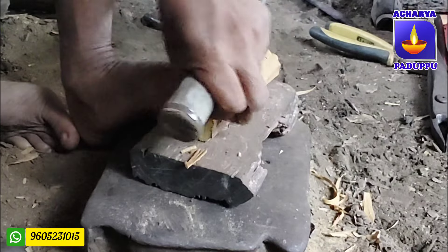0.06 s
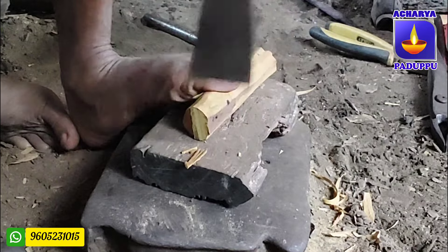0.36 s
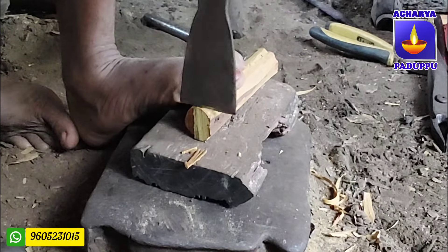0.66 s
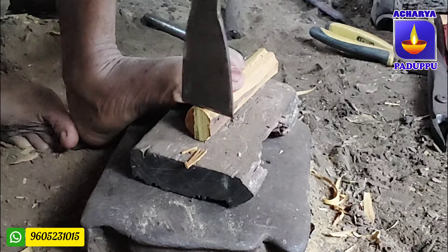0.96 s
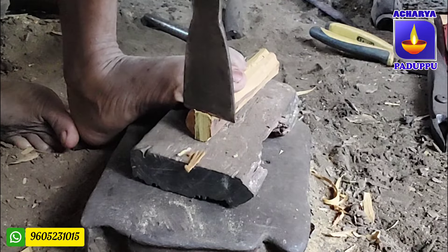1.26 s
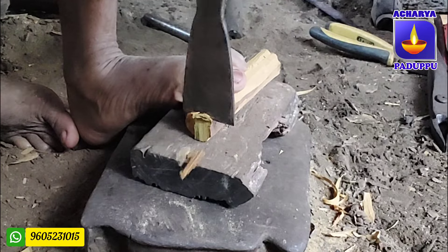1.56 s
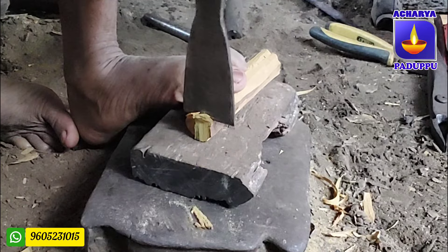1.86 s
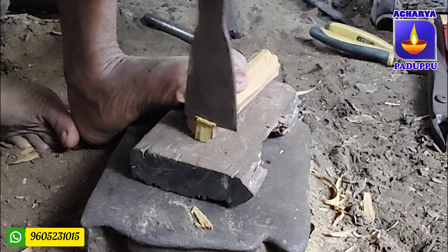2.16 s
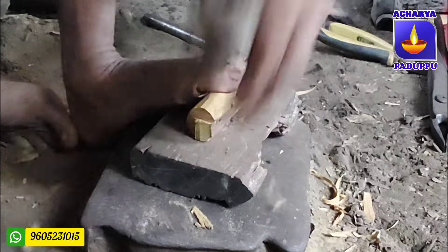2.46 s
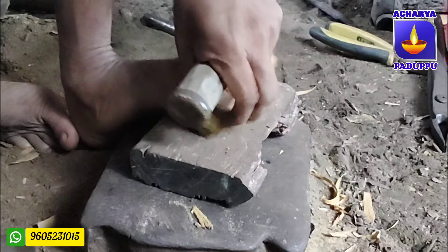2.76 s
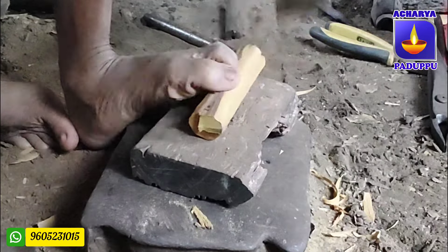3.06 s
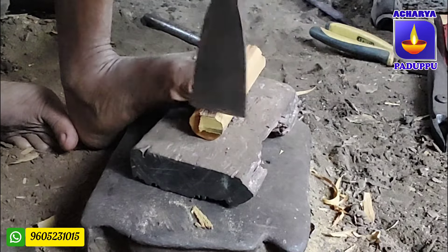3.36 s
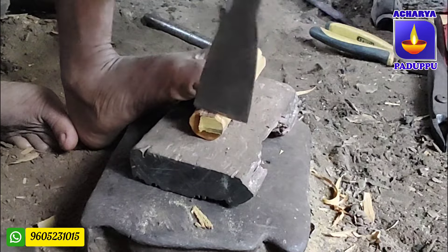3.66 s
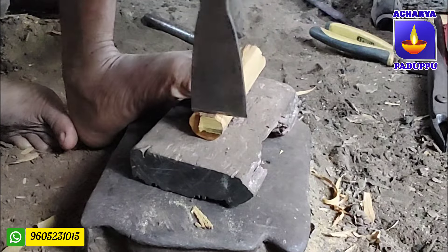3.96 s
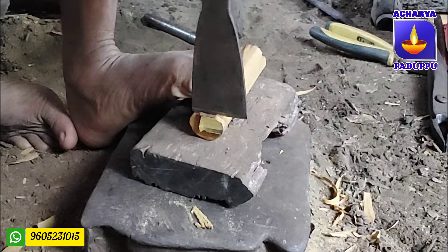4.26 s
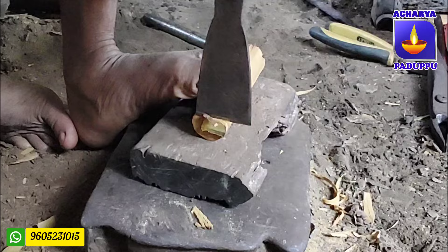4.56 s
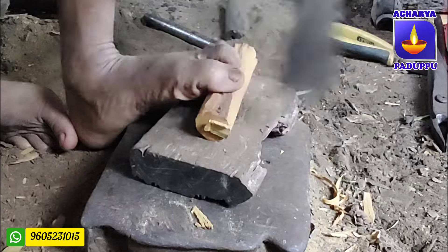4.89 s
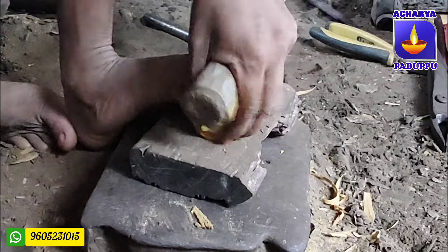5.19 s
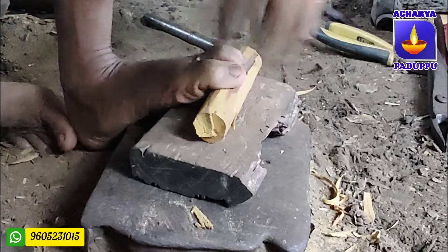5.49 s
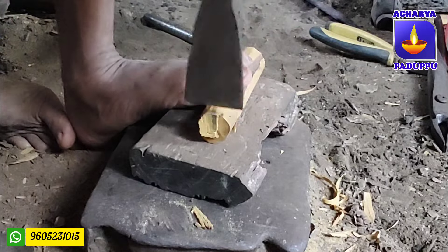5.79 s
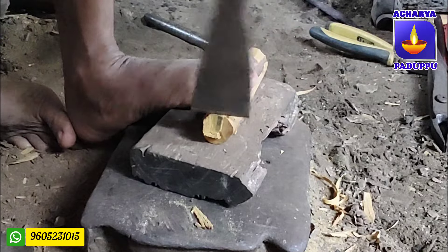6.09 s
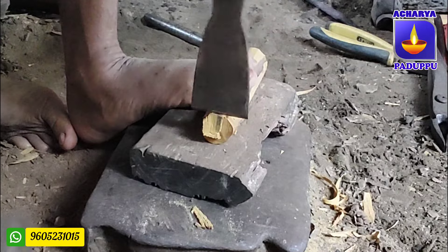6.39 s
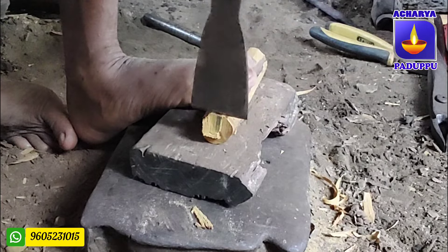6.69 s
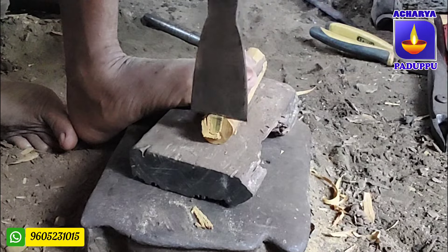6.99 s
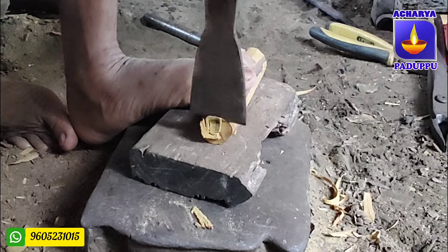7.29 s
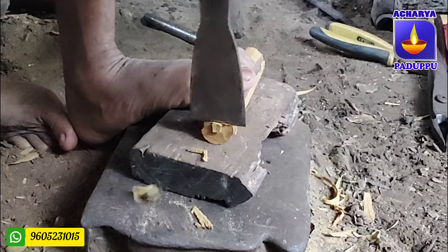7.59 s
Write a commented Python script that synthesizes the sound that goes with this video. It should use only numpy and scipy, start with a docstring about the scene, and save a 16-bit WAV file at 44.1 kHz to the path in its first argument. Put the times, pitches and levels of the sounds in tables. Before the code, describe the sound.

In a small room with a short echo, a fan rushes softly and ticks. Close by, a steel blade taps a piece of wood, then chops it three times with sharp, splintering knocks that thud through the block beneath. Dull bumps and light rubs follow as the wood is moved. Two more hard chops land, there is more shifting, and a light tap and two strong chops finish. The fan dips after loud blows and creeps back.

```python
"""In a small workshop, a heavy steel blade chops into a piece of wood on a block, in three bursts of blows.
Each blow rings wood and steel and tears fibres. Most times the wood slams onto the block a moment later.
The block rings and the floor thuds. Between bursts the wood is shifted, with soft bumps and rubs.
A fan rushes and ticks behind. An automatic gain control turns everything down at loud blows,
waits and recovers, so the fan sinks under every burst."""
import sys
import numpy as np
from scipy import signal
from scipy.fft import rfft, irfft, next_fast_len
from scipy.io import wavfile
from scipy.ndimage import uniform_filter1d, minimum_filter1d

SR = 44100
rng = np.random.default_rng(int(sys.argv[2]) if len(sys.argv) > 2 else 0)


def master_out(mix):
    """Clip the mix to full scale and print it as 16-bit PCM to the path in sys.argv[1]."""
    frames = np.transpose(np.atleast_2d(mix))
    ceiling = np.clip(frames, -1, 1)
    pcm = np.round(ceiling * 32767).astype(np.int16)
    wavfile.write(sys.argv[1], SR, pcm)


N = 341334

# The blade meets the wood; each spot favours two notes. Each row: start in seconds, knock in dB,
# main note in Hz, second note in Hz, then in dB: notes, crack, the crack's extra treble, steel, thud.
BLOWS = [(1.2340, -24, 1225, 1626, -0.5, -1, 2.5, 10.5, -1),
         (1.5907, -7.5, 1260, 1596, -15, -4, 3, 9, -2.5), (1.9017, -13, 1475, 1260, -4, -15.5, -4, -30, -1),
         (2.1850, -5.5, 1568, 1203, 4.5, -7, -2, -30, -2), (4.352, -8, 1282, 1390, 8.5, 0, 2.5, 14, -3),
         (4.7010, -7.5, 1590, 2270, 5.5, 1.5, 5, 10, -4.5),
         (6.8598, -20, 2050, 1677, 2, -1.5, 2.5, 8, -2.5), (7.2004, -7, 2104, 1360, 3, -8, 3, -20, -4),
         (7.5265, -7, 2140, 1524, 4.5, -6, 5, 9.5, -5)]
# Wood that lay hollow slams onto the block. Each row: start in seconds, knock in dB, note in Hz, note in dB.
SLAMS = [(1.241, -36, 1245, 0), (1.9100, -2.5, 1765, 6.5), (2.1914, -3.5, 1849, 8), (4.3605, -2, 1310, -3),
         (6.867, -11, 1270, 4), (7.209, -9, 1996, 2.5), (7.5355, -7.5, 1240, -7)]
# Wood, blade and foot are shifted. Each row: start in seconds, bump in dB, pitch in Hz, floor boom in dB.
BUMPS = [(0.524, -24, 224, -39), (0.659, -29, 153, -28), (2.418, -23, 161, -41), (2.511, -15, 249, -17.5),
         (3.43, -26.5, 234, -37), (5.157, -22, 256, -14.5), (5.282, -28, 198, -40),
         (5.586, -27.5, 203, -45), (5.987, -23.5, 213, -31.5)]
# Tool and wood rub. Each row: start and length in seconds, level in dB, pitch in Hz, sharpness as Q.
RUBS = [(2.368, 0.23, -42, 1580, 1.6), (2.85, 0.05, -44, 4130, 41), (5.213, 0.16, -40, 1830, 2),
        (6.656, 0.052, -43.5, 3500, 3.1)]
# Modes are the tones a struck thing rings with: here wood, blade, block, floor and the fan's tick.
# Each row: pitch in Hz, level in dB, t60 (the time to fade by 60 dB) in seconds.
WOOD_MODES = [(1159, 0, 0.014), (1237, -7, 0.08), (1360, -16, 0.011), (1502, -14.5, 0.039),
              (1688, -3.5, 0.026), (1979, -25, 0.032), (2097, -11.5, 0.041), (2112, -3, 0.082),
              (2736, -17, 0.05), (2820, -16.5, 0.1), (3146, -0.5, 0.014), (4330, -32, 0.036)]
BLADE_MODES = [(5155, -10, 0.019), (5107, -2, 0.0083), (5743, -4.5, 0.0093), (5690, -13, 0.026),
               (6240, -27, 0.01)]
BLOCK_MODES = [(410, -37.5, 0.32), (556, -13.5, 0.16), (622.2, -14.5, 0.081), (662, -26, 0.27),
               (838, -21, 0.12)]
FLOOR_MODES = [(70.76, -0.5, 0.33), (60.4, -24, 0.75), (93.6, -10.5, 0.3), (118.3, -16.5, 0.28),
               (140.4, -12.5, 0.24), (180, -24, 0.31), (216.6, -40.5, 0.37)]
TICK_MODES = [(1319, 2, 0.031), (1399, -2, 0.032), (1700, -6, 0.027)]
# The noise of splitting fibres and of the fan's air. Each row: frequency in Hz, strength there in dB.
CRACK_SPECTRUM = [(200, -9.5), (600, 2.5), (1000, -3.5), (2000, 8), (3100, -2.5), (3800, -1), (5700, -3),
                  (7000, -4.5), (8200, -13.5), (9600, -8), (11200, -17), (13000, -11), (16000, -15)]
AIR_SPECTRUM = [(25, -17), (55, -6.5), (110, 0.5), (160, -9), (280, -11), (400, -16.5), (600, -9.5),
                (850, -13.5), (1800, -11), (3800, -19), (7900, -22.5), (8900, -29), (11800, -21),
                (16000, -27)]
# How alike the air sounds left and right. Each row: frequency in Hz, likeness (1 means the same).
AIR_LIKENESS = [(60, 0.91), (130, 0.9), (290, 0.61), (640, 0.32), (1410, -0.27), (3100, 0.06),
                (15000, -0.041)]
# The fan's turning. Each row: time in seconds, turns made by then.
FAN_TURNS = [(.19, 0), (4.21, 24), (7.67, 44)]
# The workshop's echo. Each row: frequency in Hz, level in dB, t60 in seconds.
ROOM_ECHO = [(144, 20, 0.22), (504, -4, 0.11), (1550, -2, 0.13), (3080, -5.5, 0.15), (6000, -6.5, 0.15),
             (9000, -10.5, 0.15), (16000, -11, 0.11)]


def wood_knocks(note_t60=0.02, touch_s=0.0005, pan_db=2.15):
    """Each blow or slam rings all the wood's modes, plus the notes of the spot that was hit."""
    out, t = np.zeros((2, N)), seconds(.25)
    for start, knock_db, notes, _, _ in contacts():
        modes = detuned(WOOD_MODES, .008)
        # neighbouring bending modes start in opposite directions
        knock = from_db(knock_db) * (ring(modes[::2], t) - ring(modes[1::2], t))
        note = sum(swing(hz) * ring([(hz, db, note_t60)], t) for hz, db in notes)
        add(out, start, (knock + note) * chatter(t) * rising(t, touch_s) * pan(pan_db))
    return out


def contacts(second_note_db=-0.5, slam_crack_db=-5, slam_top_db=-1):
    """Blows and slams. Each row: start, knock dB, notes as (Hz, dB), crack dB, extra treble dB."""
    blows = [(start, knock_db, [(main_hz, db), (second_hz, db + second_note_db)], crack_db, top_db)
             for start, knock_db, main_hz, second_hz, db, crack_db, top_db, _, _ in BLOWS]
    # a slam tears few fibres, and dully
    slams = [(start, knock_db, [(hz, db)], knock_db + slam_crack_db, slam_top_db)
             for start, knock_db, hz, db in SLAMS]
    return blows + slams


def swing(hz):
    """A note starts in the same direction as the wood's nearest bending mode: +1 or -1."""
    return (-1) ** np.argmin([abs(mode_hz - hz) for mode_hz, _, _ in WOOD_MODES])


def chatter(t, depth=0.28):
    """The wood rattles against edge and block, which roughens its sound."""
    return 1 + depth * wobble(len(t), 70)


def fibre_cracks(bite_s=0.00082, crack_t60=0.018, splinter_db=-20, splinter_t60=0.14, top_hz=7500):
    """Fibres tear in a short burst of noise, and a few splinters snap after it."""
    out, t = np.zeros((2, N)), seconds(.25)
    likeness = [(500, 0.83), (3000, 0.0), (6000, 0)]
    tearing = coloured(CRACK_SPECTRUM, likeness, len(t) * len(contacts())).reshape(2, -1, len(t))
    treble = signal.sosfiltfilt(high_pass(top_hz), tearing)
    for k, (start, _, _, crack_db, top_db) in enumerate(contacts()):
        snaps = from_db(20 * uniform_filter1d(rng.standard_normal(len(t)), size=25))
        splinters = from_db(splinter_db) * snaps * dying(t, splinter_t60)
        burst = 2 * rising(t, bite_s) * dying(t, crack_t60)
        noise = tearing[:, k] + (from_db(top_db) - 1) * treble[:, k]
        add(out, start, from_db(crack_db) * (burst + splinters) * noise)
    return out


def fibre_crunch(band_hz=(1350, 3200), crunch_db=-6.5, rise_s=0.005, t60=0.085, likeness=0.15):
    """Crushed fibres keep crunching while the edge sinks in."""
    out, t = np.zeros((2, N)), seconds(.15)
    swell = rising(t, rise_s) * dying(t, t60)
    for start, knock_db, *_ in contacts():
        grains = signal.sosfilt(band_pass(band_hz), rng.laplace(size=(2, len(t))))
        add(out, start, from_db(knock_db + crunch_db) * widen(grains / grains.std(), likeness) * swell)
    return out


def blade_ring(bite_s=0.00082, pan_db=-1.5):
    """The steel rings briefly as it bites; its flat sends a different mix of modes to each side."""
    out, t = np.zeros((2, N)), seconds(.25)
    for start, *_, steel_db, _ in BLOWS:
        modes = detuned(BLADE_MODES, .012)
        left = ring(modes[1:], t)
        right = ring(modes[::2], t) - ring(modes[1::2], t)
        add(out, start, from_db(steel_db) * np.array([left, right]) * rising(t, bite_s) * pan(pan_db))
    return out


def block_ring(lead_s=0.016, rise_s=0.0012, block_db=2.35):
    """The block rings just before the floor gives; the load on it shifts its pitch a little."""
    out, t = np.zeros(N), seconds(.3)
    for start, thud_db, _ in thuds():
        modes = detuned(BLOCK_MODES, .006)
        add(out, start - lead_s, from_db(thud_db + block_db) * ring(modes, t) * rising(t, rise_s))
    return out


def floor_thuds(shove_s=0.0023, lead_s=0.00935, rise_s=0.01,
                return_s=0.0309, return_t60=0.058, return_db=-0.5):
    """The floor dips and springs back at a blow. Blows and bumps make it boom, and the wave returns."""
    out, t = np.zeros(N), seconds(.6)
    offset = (t - lead_s) / shove_s
    shove = (1 - offset ** 2) * np.exp(-offset ** 2 / 2)
    for start, _, shove_db in thuds():
        add(out, start - lead_s, from_db(shove_db) * shove)
    booms = [(start - lead_s, db) for start, db, _ in thuds()]
    booms += [(start, db) for start, _, _, db in BUMPS]
    for start, db in booms:
        boom = -from_db(db) * ring(FLOOR_MODES, t) * rising(t, rise_s)
        add(out, start, boom)
        add(out, start + return_s, from_db(return_db) * boom * dying(t, return_t60))
    return out


def thuds(after_blow_s=.015, after_slam_s=.0188, flat_shove_db=-9, slam_shove_db=-0.5):
    """The floor gives after a blow's last contact, harder if a slam. Each row: time, thud dB, shove dB."""
    for start, *_, db in BLOWS:
        slams = [at for at, *_ in SLAMS if 0 < at - start < .05]
        if slams:
            yield slams[0] + after_slam_s, db, db + slam_shove_db
        else:
            yield start + after_blow_s, db, db + flat_shove_db


def bumps(t60=0.077, low_t60=0.13, touch_s=0.002):
    """Gentle touches give a dull note of three quickly fading modes."""
    out, t = np.zeros(N), seconds(.3)
    for start, db, hz, _ in BUMPS:
        dull = ring([(hz, 0, t60), (hz * 0.624, -3, low_t60), (hz * 1.2, -12, t60)], t)
        add(out, start, from_db(db) * dull * rising(t, touch_s))
    return out


def rubs(grit_db=-1):
    """Short, faint swishes over grit; where steel slides they sing a little."""
    out = np.zeros(N)
    for start, length, db, hz, sharpness in RUBS:
        t = seconds(length)
        swish = signal.lfilter(*signal.iirpeak(hz, sharpness, fs=SR), rng.standard_normal(len(t)))
        grit = rng.laplace(size=len(t)) * chatter(t, depth=1.0)
        rub = swish / swish.std() + from_db(grit_db) * grit / grit.std() / sharpness
        add(out, start, from_db(db) * rub * np.hanning(len(t)))
    return out


def workshop_echo(sound, first_s=0.0053, build_s=0.0013, wall_s=0.027, wall_db=5.5, wall_width_s=0.0091,
                  absorbed_s=0.55, likeness=0.16):
    """Echoes build up fast, swell again from the far wall and are soon soaked up by the earth floor."""
    t = seconds(.35)
    shape = rising(np.maximum(t - first_s, 0), build_s) / (1 + (t / absorbed_s) ** 4)
    shape *= from_db(wall_db * np.exp(-((t - wall_s) / wall_width_s) ** 2))
    echo = 0
    for hz, pair in noise_bands(len(t)):
        band = widen(pair, likeness) * shape * dying(t, at_hz(ROOM_ECHO, hz, column=2))
        # each side gets the same energy per Hz
        band *= np.sqrt(hz / SR) / np.linalg.norm(band, axis=1, keepdims=True)
        echo += from_db(at_hz(ROOM_ECHO, hz)) * band
    return signal.fftconvolve(sound, echo, axes=1)[:, :N]


def fan_rush(flicker_db=2.5, treble_hz=9000):
    """The fan's air makes a broad noise; apart from it, the treble above 9 kHz flickers."""
    air = coloured(AIR_SPECTRUM, AIR_LIKENESS, N)
    treble = signal.sosfiltfilt(high_pass(treble_hz), air)
    return air + treble * (from_db(flicker_db * wobble(N, 900)) - 1)


def fan_ticks(tick_db=11.0, rise_s=0.0082):
    """The fan ticks faintly once on every turn."""
    out, t = np.zeros((2, N)), seconds(.15)
    times, turns = np.transpose(FAN_TURNS)
    for start in np.interp(np.arange(turns[-1] + 1), turns, times):
        tick = np.array([ring(detuned(TICK_MODES, .02), t) for side in range(2)])
        add(out, start, from_db(tick_db + rng.standard_normal()) * tick * rising(t, rise_s))
    return out


def gain_control(sound, threshold_db=-8.0, share=0.67, hold_s=0.89, release_db_per_s=31,
                 start_duck_db=5.0, start_hold_s=0.26):
    """Loud peaks pull the volume down at once; it stays down for a while and then creeps back."""
    t, hold = np.arange(N) / SR, int(hold_s * SR)
    power = uniform_filter1d(np.mean(sound ** 2, axis=0), size=220)
    level_db = 10 * np.log10(np.maximum(power, 1e-12))
    duck_db = share * np.maximum(level_db - threshold_db, 0)
    held_db = -minimum_filter1d(-duck_db, size=hold, origin=(hold - 1) // 2)
    held_db = np.maximum(held_db, start_duck_db * (t < start_hold_s))   # the volume starts out low
    released_db = np.maximum.accumulate(held_db + release_db_per_s * t) - release_db_per_s * t
    return sound * from_db(-uniform_filter1d(released_db, size=60))


def ring(modes, t, scatter_db=1.0):
    """Struck modes are fading sine waves, each a little stronger or weaker every time."""
    return sum(from_db(db + scatter_db * rng.standard_normal()) * dying(t, t60)
               * np.sin(2 * np.pi * hz * t) for hz, db, t60 in modes)


def detuned(modes, spread):
    """The same modes, each with its pitch shifted a little at random."""
    return [(hz * (1 + spread * rng.standard_normal()), db, t60) for hz, db, t60 in modes]


def wobble(size, smooth_samples):
    """A smoothed random wiggle, typically 1 in size."""
    noise = uniform_filter1d(rng.standard_normal(size), size=smooth_samples)
    return noise / noise.std()


def coloured(spectrum, likeness, size):
    """Stereo noise with a given strength and left-right likeness at each frequency."""
    padded = next_fast_len(size)
    hz = np.maximum(np.fft.rfftfreq(padded, 1 / SR), 1)
    white = widen(rfft(rng.standard_normal((2, padded))), at_hz(likeness, hz))
    noise = irfft(from_db(at_hz(spectrum, hz)) * white, padded)[:, :size]
    return noise / noise.std()


def noise_bands(size):
    """Noise in half-octave bands. Each row: centre in Hz, two unrelated noises."""
    edges = np.geomspace(22, 17500, 20)
    white = rng.standard_normal((2, 2, size + 4000))
    for k, (low, high) in enumerate(zip(edges, edges[1:])):
        yield np.sqrt(low * high), signal.sosfilt(band_pass([low, high]), white[k % 2])[:, -size:]


def widen(pair, likeness):
    """Two unrelated noises become a left and a right that are partly alike."""
    return (np.sqrt(1 + likeness) * pair[0] + np.sqrt(1 - likeness) * pair[1] * [[1], [-1]]) / np.sqrt(2)


def pan(db):
    """Raise the left side by db and lower the right as much."""
    return from_db([[db], [-db]])


def high_pass(hz):
    """A filter that keeps what lies above hz."""
    return signal.butter(2, hz, "high", fs=SR, output="sos")


def band_pass(edges_hz):
    """A filter that keeps what lies between two frequencies."""
    return signal.butter(2, edges_hz, "band", fs=SR, output="sos")


def from_db(db):
    """Turn decibels into a multiplier."""
    return 10 ** (np.asarray(db) / 20)


def at_hz(table, hz, column=1):
    """Read between a table's rows, with octaves evenly spaced."""
    table = np.array(table)
    return np.interp(np.log(hz), np.log(table[:, 0]), table[:, column])


def seconds(length):
    """The time of each sample."""
    return np.arange(int(length * SR)) / SR


def rising(t, rise_s):
    """A fade-in from 0 towards 1."""
    return 1 - np.exp(-t / rise_s)


def dying(t, t60):
    """A fade-out that loses 60 dB in t60 seconds."""
    return np.exp(-np.log(1000) * t / t60)


def add(out, start_s, sound):
    """Mix a sound in at its start time."""
    at = int(start_s * SR)
    out[..., at:at + sound.shape[-1]] += sound[..., :N - at]


def scene(room_db=-5, low_cut_hz=54, fan_db=-39.5):
    """The work is close, the fan fills the room; the small floor gives off little deep bass."""
    near = wood_knocks() + fibre_cracks() + fibre_crunch() + blade_ring() + block_ring() + rubs()
    low = signal.sosfilt(high_pass(low_cut_hz), floor_thuds() + bumps())
    fan = from_db(fan_db) * (fan_rush() + fan_ticks())
    return near + from_db(room_db) * workshop_echo(near) + low + fan


def record(dry, rumble_hz=22, top_hz=16000):
    """Rumble is cut, the volume ducks under blows, the sharpest peaks still overload, the top is cut."""
    ducked = gain_control(signal.sosfilt(high_pass(rumble_hz), dry))
    clipped = ducked / (1 + ducked ** 6) ** (1 / 6)
    return signal.sosfilt(signal.ellip(10, .2, 70, top_hz, fs=SR, output="sos"), clipped)


dry = scene()
out = record(dry)
master_out(out)
```